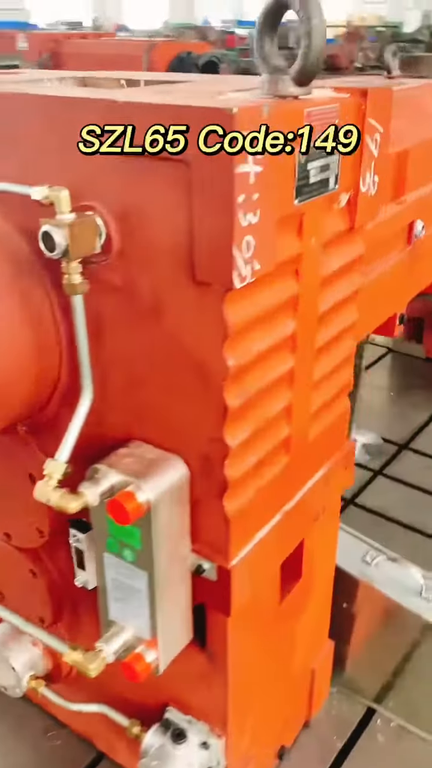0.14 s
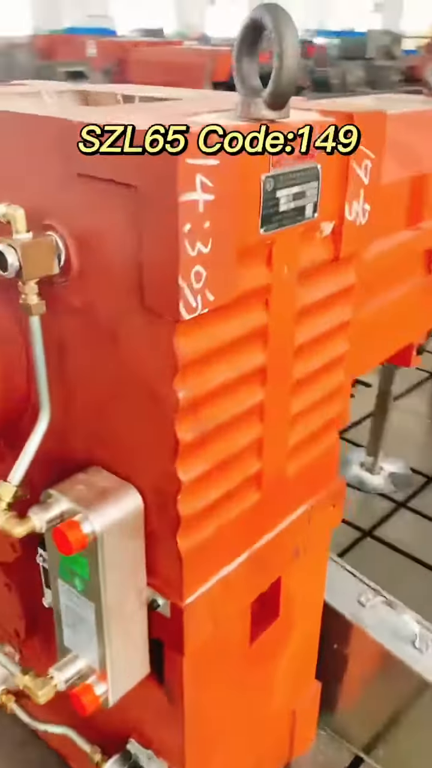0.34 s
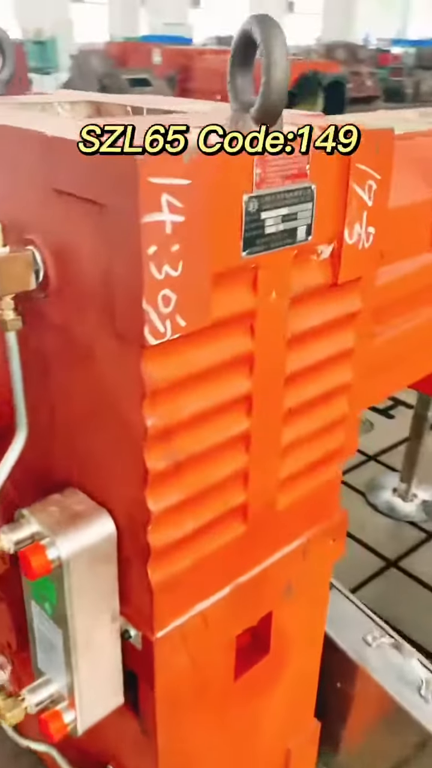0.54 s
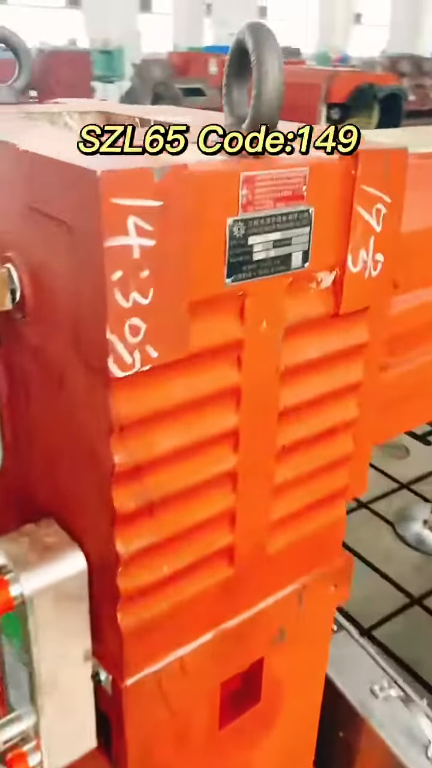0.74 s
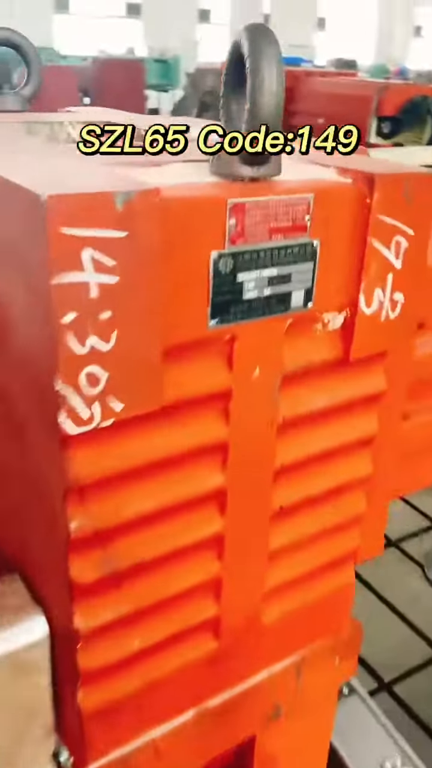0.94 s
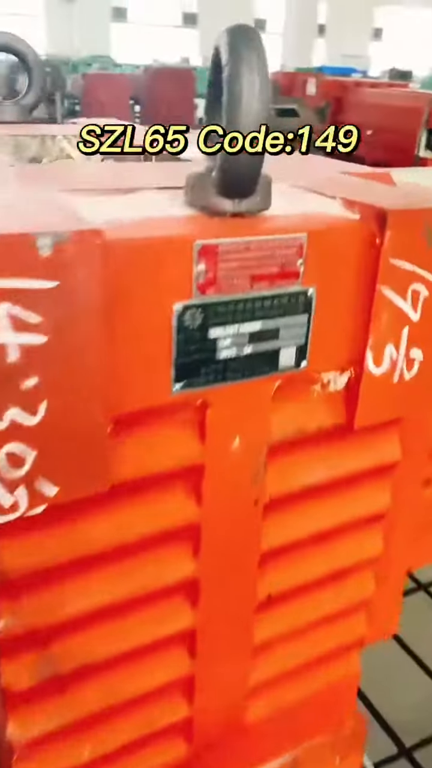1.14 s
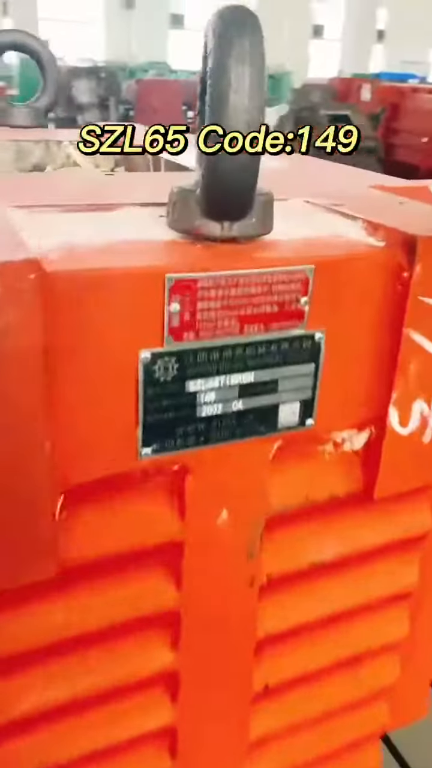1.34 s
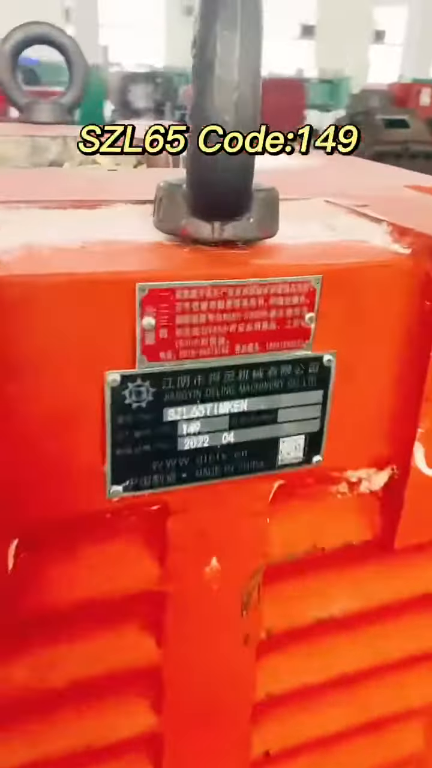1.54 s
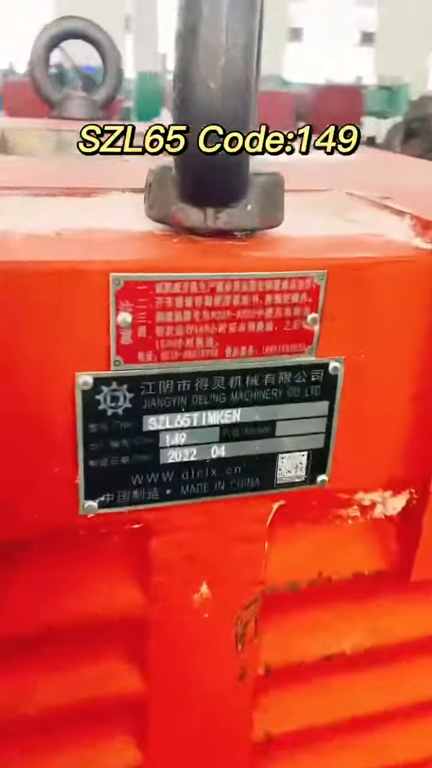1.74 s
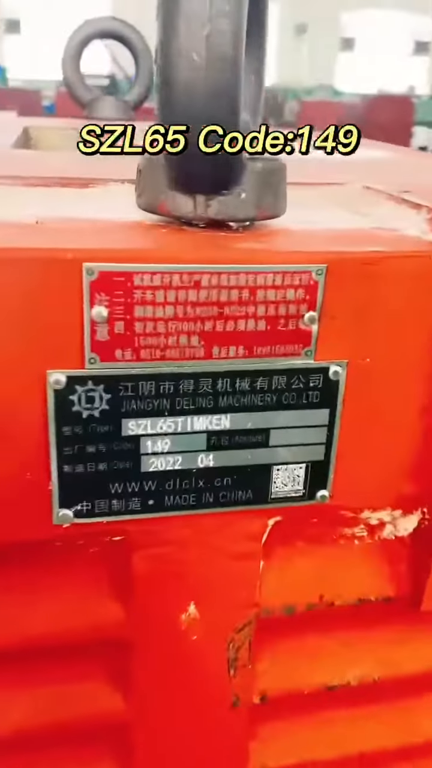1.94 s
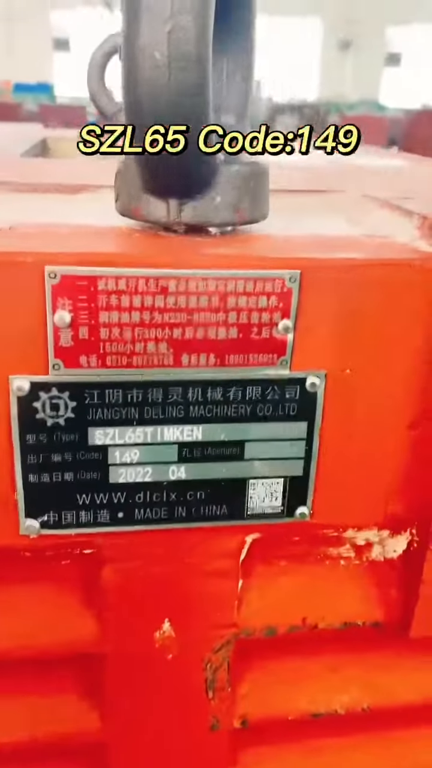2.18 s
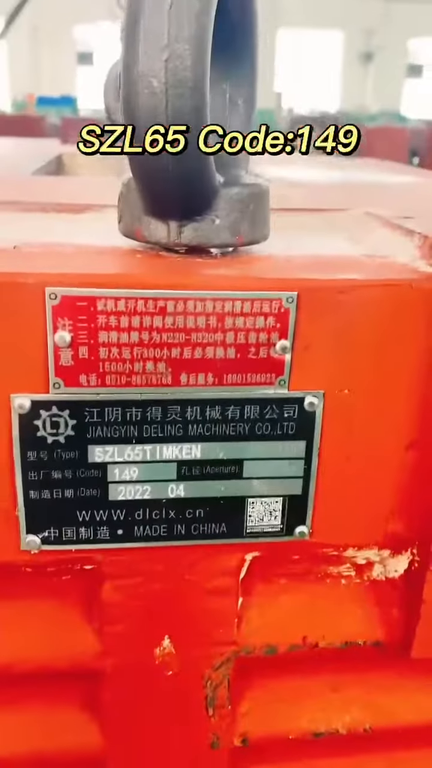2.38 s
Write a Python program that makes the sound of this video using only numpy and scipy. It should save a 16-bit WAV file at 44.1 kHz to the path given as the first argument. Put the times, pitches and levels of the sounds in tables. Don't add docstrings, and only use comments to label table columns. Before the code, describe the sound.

Gearbox running with dense low roar and high steady whine, a steel scrape squealing midway through

```python
import sys
import numpy as np
from scipy import signal
from scipy.fft import rfft, irfft, next_fast_len
from scipy.io import wavfile
from scipy.ndimage import uniform_filter1d, map_coordinates

SR = 44100
rng = np.random.default_rng(int(sys.argv[2]) if len(sys.argv) > 2 else 0)


def volts(x):
    e = np.asarray(x, float) / 20
    return 10 ** e


def master_out(mix):
    frames = np.transpose(np.atleast_2d(mix))
    ceiling = np.clip(frames, -1, 1)
    pcm = np.round(ceiling * 32767).astype(np.int16)
    wavfile.write(sys.argv[1], SR, pcm)


N = 110691
HUM_HZ, MESH_HZ, DRONE_HZ = 82, 325.5, 155


def along(points, hz):
    f, v = np.transpose(points)
    return np.interp(np.log(hz + 1), np.log(f + 1), v)


def unit(x):
    return x / np.sqrt(np.mean(np.abs(x) ** 2) + 1e-20)


def curves(rows):
    s, *columns = np.transpose(rows)
    return [np.interp(np.arange(N) / SR, s, column) for column in columns]


def wobble(rate):
    coarse = np.arange(0, N + 32, 32)
    knots = rng.standard_normal(200)
    return np.interp(np.arange(N), coarse, map_coordinates(knots, [coarse * min(rate, 70) / SR]))


def filtered(x, response):
    m = next_fast_len(N + SR // 4)
    return irfft(rfft(x, m) * response(np.fft.rfftfreq(m, 1 / SR)), m)[:N]


def noise(spectrum):
    def response(hz):
        inside = (hz > spectrum[0][0]) * (hz < 1.04 * spectrum[-1][0])
        return volts(along(spectrum, hz)) * inside
    return unit(filtered(rng.standard_normal(N), response))


def fuzzy(hz, width_hz):
    return unit(filtered(rng.standard_normal(N), lambda f: 1 / (1 + (2 * (f - hz) / width_hz) ** 2)))


def tone(hz, wander):
    return np.sqrt(2) * np.sin(2 * np.pi * (hz * np.arange(N) / SR + wander * wobble(21)))


def dying(s, t60, rise_s):
    t = np.maximum(np.arange(N) / SR - s, 0)
    return (1 - np.exp(-t / rise_s)) * volts(-60 * t / t60)


def patchy(x, patchy_db):
    z = signal.stft(x, nperseg=1024)[2]
    field = uniform_filter1d(rng.standard_normal(z.shape), size=6, axis=0)
    field = uniform_filter1d(field, size=10, axis=1)
    return unit(signal.istft(z * volts(patchy_db * unit(field)), nperseg=1024)[1][:N])


# time in seconds, level in dB, extra bass in dB, extra treble in dB.
PATH = [
    (0.0, -23, -7, 1),
    (0.03, -22, -15, -1),
    (0.3, -22.5, 5, 6.5),
    (0.32, -19, -10, 1),
    (1.07, -20, 2.5, 0),
    (1.57, -16.5, -5, -1.5),
    (1.84, -21.5, 3.5, 0.5),
    (2.51, -22, -4, -1),
]
# frequency in Hz, density in dB per Hz.
ROAR_SPECTRUM = [(15, -65), (25, -22.5), (81, -2.5), (320, -1), (855, -9.5), (1730, -14), (4500, -31),
                 (5960, -29), (6700, -39), (8710, -78), (14700, -120)]
# frequency in Hz, density in dB per Hz.
HISS_SPECTRUM = [(4880, -45), (8300, -6), (11000, -1), (11800, 1.5), (12400, -1), (16100, -25),
                 (22000, -120)]
# frequency in Hz, width in Hz, level in dB.
HOUSING_MODES = [(173, 15, -39), (378.2, 8.5, -42.5), (624.4, 13, -37.5), (710.7, 53, -35.5),
                 (763, 36, -42.5), (1026, 55, -37), (1772, 110, -37), (103, 15, -37)]


def machinery():
    level_db, bass_db, treble_db = curves(PATH)
    roar = patchy(noise(ROAR_SPECTRUM), patchy_db=1.28) * volts(level_db.mean())
    for hz, width_hz, db in HOUSING_MODES:
        roar = roar + volts(db + 0.76 * wobble(2.61)) * fuzzy(hz, width_hz)

    def room_for_tones(hz):
        dips = [(HUM_HZ, 14), (MESH_HZ, 12), (DRONE_HZ, 12)]  # (Hz, half width Hz), each 4 dB deep
        return volts(sum(-4 / (1 + ((hz - centre) / half) ** 4) for centre, half in dips))
    roar = filtered(roar, room_for_tones)
    bass = filtered(roar, lambda hz: 1 / (1 + (hz / 134) ** 4))
    treble = filtered(roar, lambda hz: 1 / (1 + (1530 / (hz + 1)) ** 4))
    moved = roar - bass - treble + bass * volts(bass_db) + treble * volts(treble_db)
    hiss = volts(-54 + .8 * wobble(5)) * patchy(noise(HISS_SPECTRUM), patchy_db=1.5)
    return moved * volts(level_db - level_db.mean()) + hiss


# time in seconds, level in dB, relative level of the octave comb in dB.
WHINE_LEVEL = [(0.0, -51.5, -25), (0.06, -43.5, -19), (0.59, -42, -22), (0.78, -47.5, -7.5),
               (1.08, -39, -20), (1.15, -45.5, -13), (1.24, -41, -16), (1.29, -44, -13.5),
               (1.66, -43.5, -13.5), (1.84, -40, -21), (2.35, -45, -13), (2.51, -40, -19)]
LOWER_LINES = [-55, -61, -62, -60, -55, -51, -48, -47, -53, -60, -63, -70, -66, -59]
OCTAVE_LINES = [-73, -69, -71, -73, -72, -74, -67, -70, -63, -64, -69, -71, -70, -78, -74]


def drive():
    level_db, octave_db = curves(WHINE_LEVEL)
    t = np.arange(N) / SR
    spacing_hz, drift_hz = 71.4, 1.5
    slip = np.cumsum(drift_hz * wobble(2.39)) / SR
    loose = np.interp(t, (1.5, 1.75), [1, .3])

    def comb(first_hz, lines):
        total = 0
        for k, db in enumerate(lines):
            own_phase = loose * (rng.random() + .3 * wobble(4))
            cycles = (first_hz + k * spacing_hz) * t + slip + own_phase
            total = total + volts(db + 2.5 * wobble(6)) * np.sqrt(2) * np.sin(2 * np.pi * cycles)
        return total
    lower = volts(0.6) * comb(5538, LOWER_LINES)
    octave = volts(-0.1 + octave_db - octave_db.mean()) * comb(11361, OCTAVE_LINES)
    return volts(level_db - level_db.mean()) * (lower + octave)


# time in seconds, level in dB.
SHAFT_LEVEL = [(0.0, -35), (0.56, -37), (0.64, -22), (0.67, -32), (0.78, -23), (0.87, -25), (0.9, -56),
               (1.36, -34), (1.47, -16.5), (1.59, -38), (1.62, -14.5), (1.78, -43), (1.84, -21.5),
               (2.02, -34), (2.04, -24), (2.4, -31), (2.43, -46), (2.51, -24)]
# time in seconds, level in dB.
MESH_LEVEL = [(0.0, -32), (0.4, -36.5), (0.45, -27.5), (0.82, -35), (0.96, -26.5), (1.04, -46), (1.23, -21),
              (1.29, -33.5), (1.73, -29), (1.86, -40), (1.9, -29), (1.98, -37), (2.12, -30.5), (2.31, -39),
              (2.44, -29.5), (2.51, -44)]
# time in seconds, level in dB.
DRONE_LEVEL = [(0.0, -49), (0.04, -30), (0.8, -38.5), (0.97, -24), (1.02, -38), (1.19, -30), (1.37, -43),
               (1.47, -31), (1.81, -48), (1.87, -34), (1.91, -38), (2.33, -28), (2.36, -38), (2.51, -41)]


def hum():
    shaft = volts(curves(SHAFT_LEVEL)[0] - 4.5) * tone(HUM_HZ, 0.17)
    mesh = volts(curves(MESH_LEVEL)[0]) * tone(MESH_HZ, 0.13)
    drone = volts(curves(DRONE_LEVEL)[0] - 1.5) * tone(DRONE_HZ, 0.067)
    return shaft + mesh + drone


# start in seconds, level in dB, decay time T60 in seconds.
PING_EVENTS = [
    (2.36, -37, 0.38),
    (2.37, -45, 3),
    (2.46, -27, 0.53),
    (0.4, -42.5, 2.3),
    (2.33, -42, 2.8),
    (0.022, -30.5, 1.3),
    (2.345, -59, 0.74),
    (3.1, -60, .4),
    (2.32, -57, 1),
    (2.355, -60, .4),
]
PING_MODE_HZ = [3400, 5495, 1900, 3950, 2500, 1750, 8750, 8245, 8245, 9710]


def pings():
    total = 0
    for hz, (s, db, t60) in zip(PING_MODE_HZ, PING_EVENTS):
        ring = unit(.7 * tone(hz, 0.16) + fuzzy(hz, 42))
        total = total + volts(db) * dying(s, t60, 0.012) * ring
    return total


# start in seconds, level in dB, decay time T60 in seconds.
PUFF_EVENTS = [
    (.30, -44.5, 0.47),
    (1.11, -45.5, 0.52),
    (1.30, -44.5, 0.91),
]
# frequency in Hz, density in dB per Hz.
PUFF_SPECTRUM = [(3000, -36), (5000, -11.5), (9000, 8), (12500, 0)]


def puffs():
    envelope = sum(volts(db) * dying(s, t60, 0.0084) for s, db, t60 in PUFF_EVENTS)
    return filtered(envelope * noise(PUFF_SPECTRUM), lambda hz: np.where(hz > 6860, 1, volts(6)))


# frequency in Hz, level in dB.
SQUEAL_PARTIALS = [(4880, -49), (6810, -57), (8900, -66), (10300, -65), (3960, -54)]


def squeal():
    t = np.arange(N) / SR
    start_s, end_s, fade_s = .69, 1.2, .04
    held = np.clip(np.minimum(t - start_s, end_s - t) / fade_s, 0, 1)
    total = 0
    for hz, db in SQUEAL_PARTIALS:
        total = total + volts(db + 1.8 * wobble(30)) * (tone(hz, .15) + .4 * fuzzy(hz, 45))
    return held * total


# time in seconds, level in dB.
SCRAPE_LEVEL = [
    (1.085, -39),
    (1.11, -31),
    (1.171, -27),
    (1.491, -29),
    (1.53, -27.5),
    (1.552, -33),
    (1.665, -31.5),
    (1.69, -36.5),
    (1.98, -40),
]
# frequency in Hz, the two main modes first.
BAR_MODE_HZ = [2470, 2963, 4415, 4620, 2280, 2370, 4790, 2900]
# level in dB, change of level in dB per second.
BAR_MODES = [(-4.5, -5.5), (-5.5, -4), (-4.5, -8.5), (-4, -9.5), (-17, 6), (-12, 7.5), (-10.5, 0.5),
             (-15, -4)]
# time in seconds, flare of the lower main mode in dB, of the upper in dB.
BAR_JOLTS = [(1.11, -5, -4), (1.135, 0.5, -2), (1.165, -7, 7), (1.195, 5, 5), (1.215, -2, -6),
             (1.234, 3, 2), (1.275, 5, 8), (1.31, 8, -7), (1.355, 9.5, -3.5), (1.395, 2, -1),
             (1.441, -3, 4), (1.51, 6, 3), (1.536, 0.5, 10), (1.57, 0.5, -3), (1.635, 2, 8.5),
             (1.81, 5, 14)]
# frequency in Hz, density in dB per Hz.
CONTACT_SPECTRUM = [(300, -50), (900, -10.5), (2300, 1.5), (3300, -6), (4100, -8.5), (4600, -4.5),
                    (5100, -13), (6500, -25.5)]


def scrape():
    t = np.arange(N) / SR
    since = t - SCRAPE_LEVEL[0][0]
    fall_db = 35 * np.maximum(since - .9, 0)
    effort = volts(curves(SCRAPE_LEVEL)[0] - fall_db) * np.clip(since / 0.015, 0, 1)
    s, *flares = np.transpose(BAR_JOLTS)
    bumps = np.exp(-((t[::32, None] - s) / .013) ** 2)
    flare_db = [np.repeat(bumps @ flare, 32)[:N] for flare in flares]
    flare_db = flare_db + [0] * (len(BAR_MODES) - len(flares))
    bar = 0
    for hz, (db, sag_db), jolt_db in zip(BAR_MODE_HZ, BAR_MODES, flare_db):
        mode = fuzzy(hz, 53 if hz < 4000 else 110)
        if hz in BAR_MODE_HZ[:2]:
            mode = mode + 1.8 * tone(hz, 0.09)
        rattle_db = 1.5 * wobble(28)
        bar = bar + volts(db + jolt_db + sag_db * since + rattle_db) * mode
    return effort * (volts(-5.5) * bar + volts(0.2) * noise(CONTACT_SPECTRUM))


def scene():
    return (machinery() + drive() + hum() + pings() + puffs() + squeal() + scrape())[None]


# frequency in Hz, step over masking level in dB.
CELL_STEP = [(300, -25), (1500, -4), (2600, 3.5), (5000, 3.5), (5700, -1), (9000, 1.5), (12500, 0)]


def ragged_band(x, size=1024):
    n, k = np.arange(2 * size), np.arange(size)
    window = np.sin(np.pi * (n + .5) / (2 * size))
    basis = window * np.cos(np.pi / size * np.outer(k + .5, n + .5 + size / 2)) * np.sqrt(2 / size)
    x = np.pad(x, (size + size // 2, 3 * size - N % size), mode="reflect")
    count = len(x) // size - 1
    c = basis @ np.array([x[i * size:(i + 2) * size] for i in range(count)]).T
    hz, s = (k + .5) * SR / (2 * size), (np.arange(count) - .5) * size / SR

    def draw(cells):
        field = uniform_filter1d(rng.standard_normal((len(k), count)), size=2, axis=1)
        return unit(field)[k // cells]

    low, gap, stray, fringe, full = 6330, 6860, 7950, 8230, 8900
    top, end = 12400, 13050
    power = uniform_filter1d(uniform_filter1d(c * c, size=48, axis=0), size=3, axis=1)
    mask = np.sqrt(abs(power)) + 1e-9
    starved_db = 7.5 * np.outer((hz > stray) * (hz < 9700), s > 2.33)
    step = mask * volts(along(CELL_STEP, hz)[:, None] + 2.2 * draw(10) + starved_db)
    c = np.sign(c) * np.floor(abs(c) / step + .4054) * step

    edge_open, fringe_open, top_open = .42, .7, .27
    share = np.interp(hz, [low - 1, low, gap, gap + 1, fringe, fringe + 1, full, top, top + 1, end, end + 1],
                      [1, 1.5 * edge_open, 0.21 * edge_open, 0, 0, fringe_open, 1, 1,
                       1.6 * top_open, .3 * top_open, 0])
    closing = .1 * np.outer((hz > low) * (hz < gap), 1 - s)
    share = share[:, None] + closing
    loss_db = np.interp(hz, [top, end], [0, -6])
    loud = abs(uniform_filter1d(c * c, size=5, axis=0)) > volts(2 * -34)
    strong = loud * ((hz > 6700) * (hz < gap))[:, None]
    chance = 1 / (1 + np.exp(-1.7 * draw(7)))
    c = c * (strong | (chance < share)) * volts(loss_db)[:, None]
    frames = (basis.T @ c).T
    out = np.pad(frames[:, :size], ((0, 1), (0, 0))) + np.pad(frames[:, size:], ((1, 0), (0, 0)))
    return out.ravel()[size + size // 2:][:N]


def top_cut(x):
    return signal.sosfilt(signal.butter(12, 13090, fs=SR, output="sos"), x)


def record(dry):
    mix = ragged_band(dry[0])[None]
    return top_cut(mix)


dry = scene()
out = record(dry)
master_out(out)
```